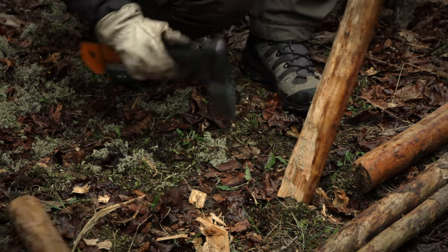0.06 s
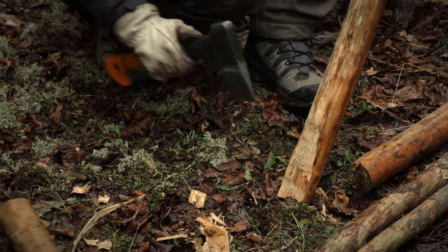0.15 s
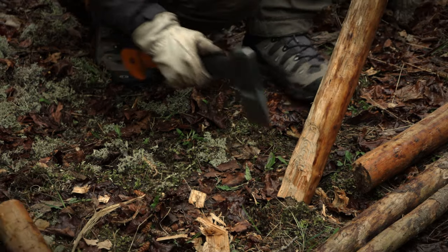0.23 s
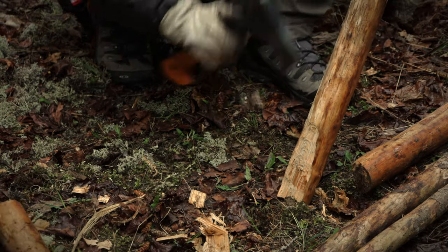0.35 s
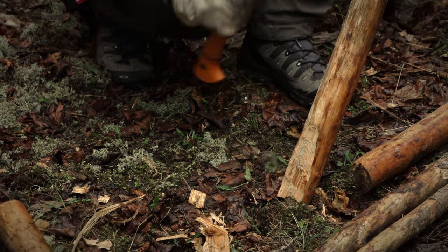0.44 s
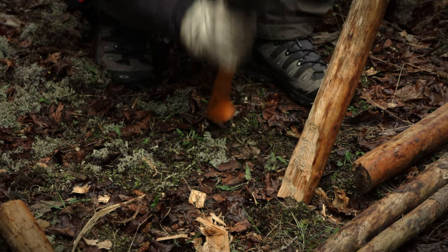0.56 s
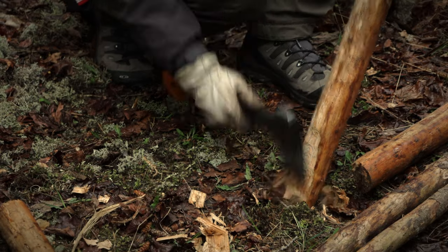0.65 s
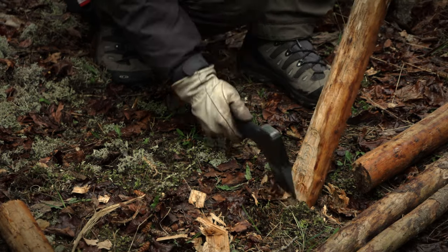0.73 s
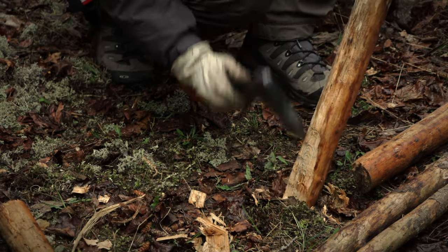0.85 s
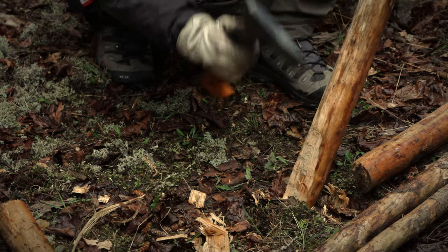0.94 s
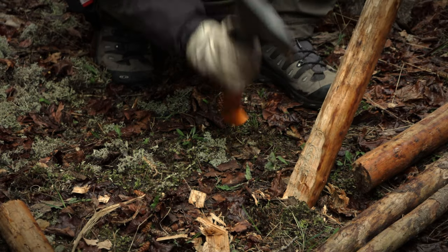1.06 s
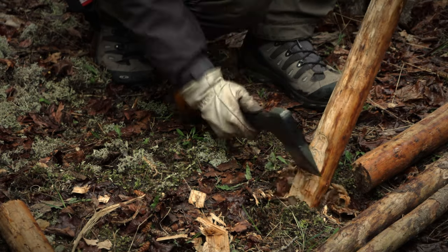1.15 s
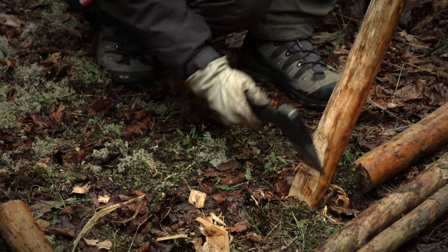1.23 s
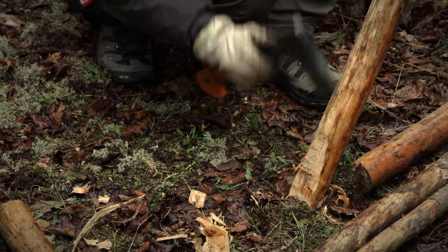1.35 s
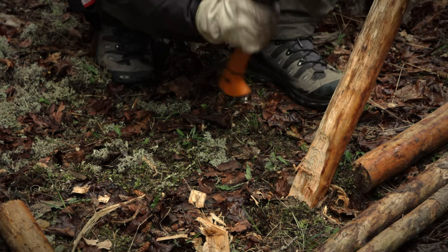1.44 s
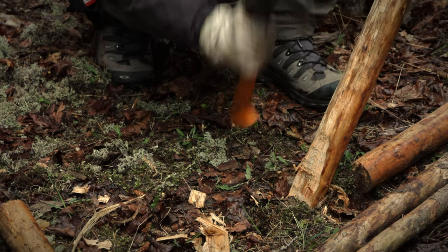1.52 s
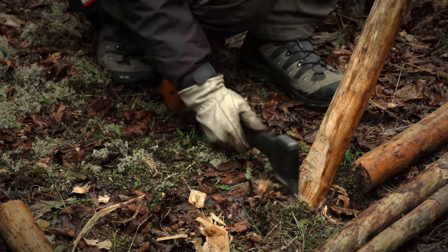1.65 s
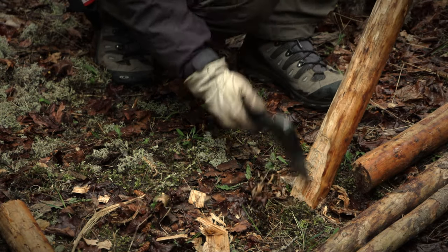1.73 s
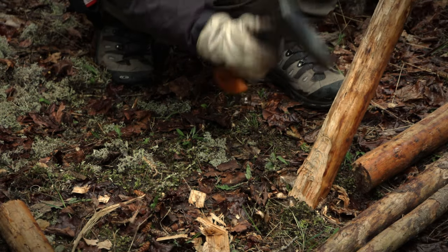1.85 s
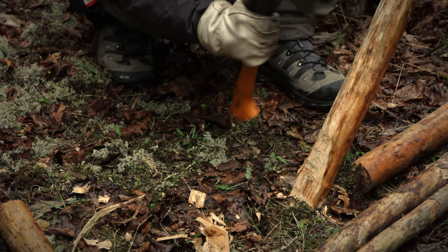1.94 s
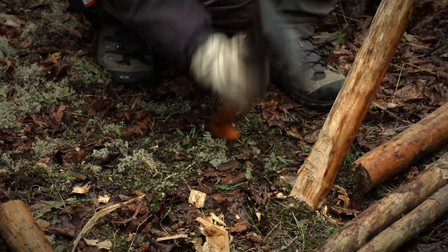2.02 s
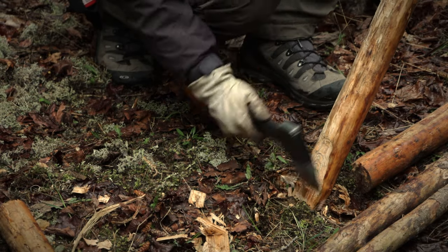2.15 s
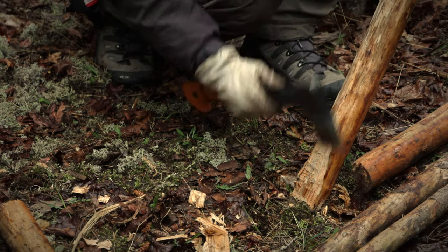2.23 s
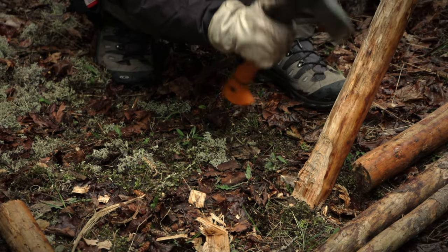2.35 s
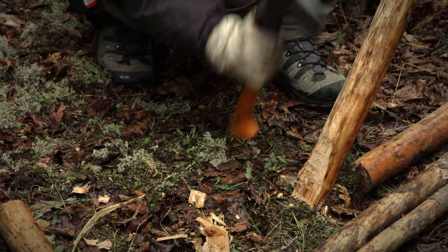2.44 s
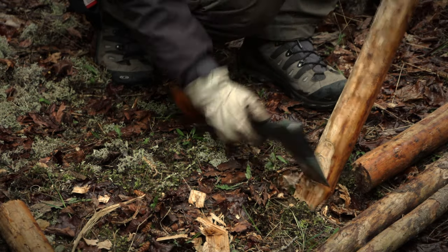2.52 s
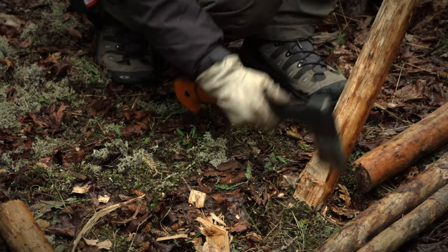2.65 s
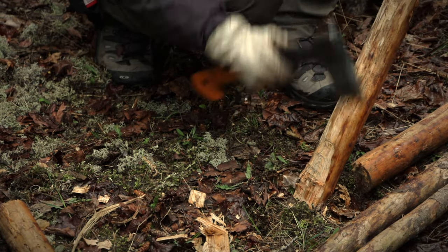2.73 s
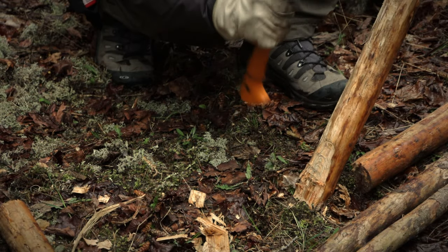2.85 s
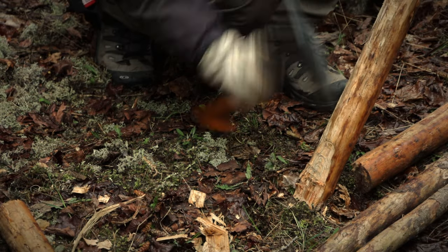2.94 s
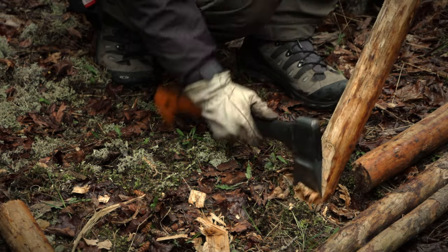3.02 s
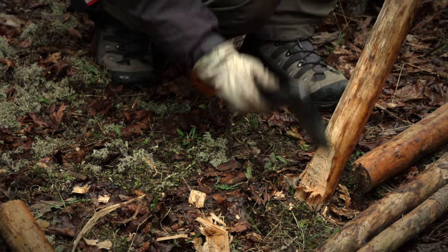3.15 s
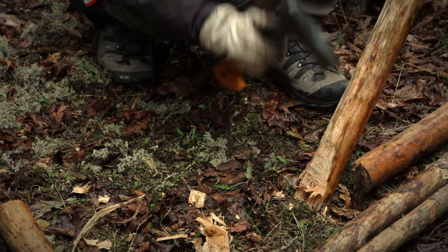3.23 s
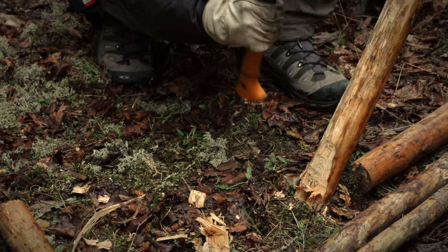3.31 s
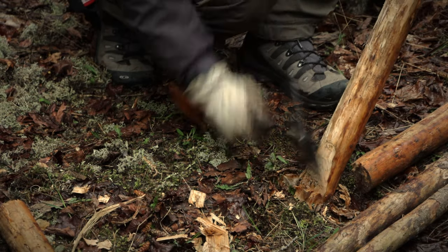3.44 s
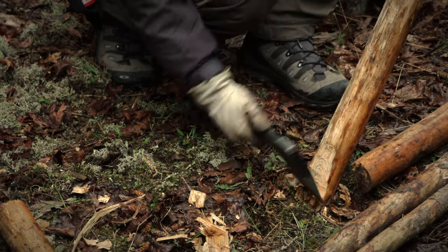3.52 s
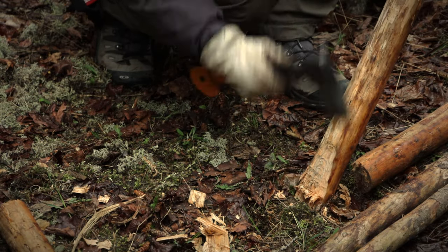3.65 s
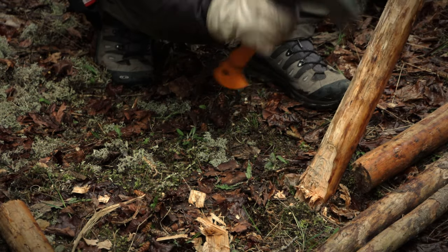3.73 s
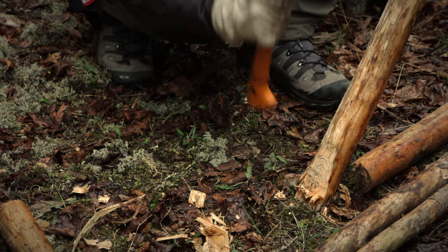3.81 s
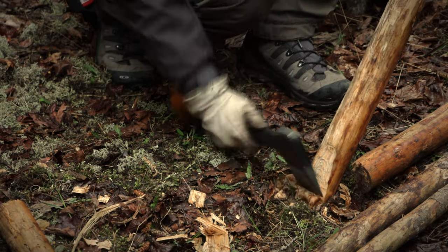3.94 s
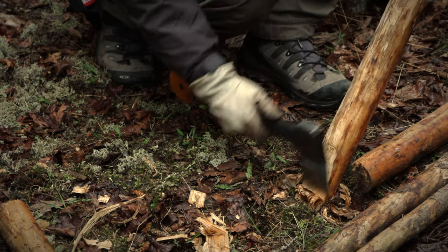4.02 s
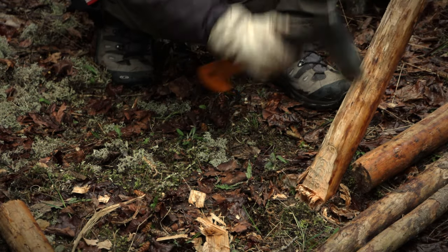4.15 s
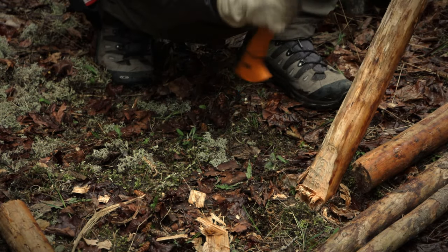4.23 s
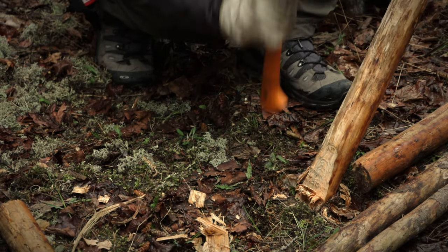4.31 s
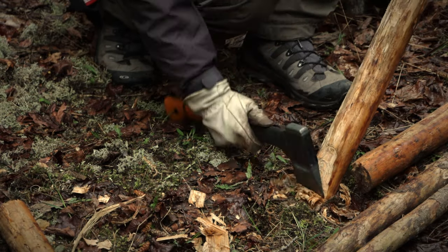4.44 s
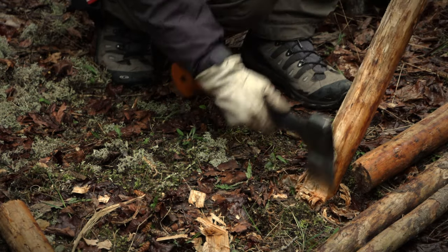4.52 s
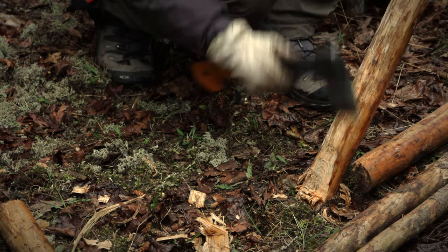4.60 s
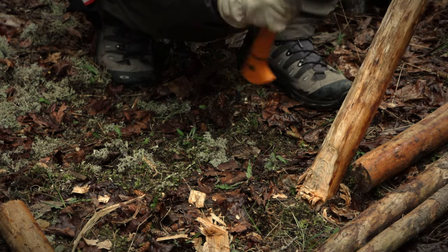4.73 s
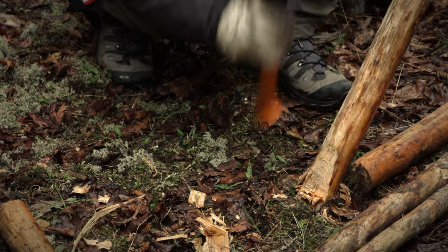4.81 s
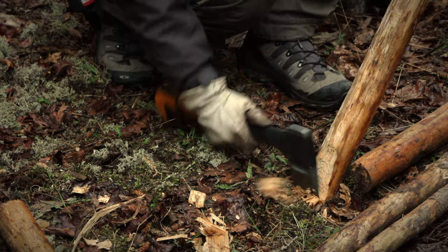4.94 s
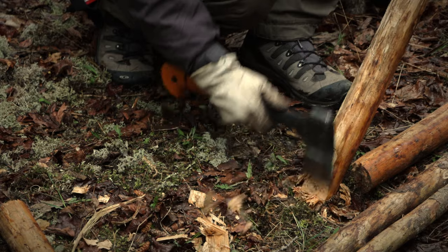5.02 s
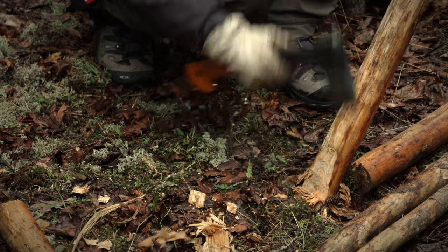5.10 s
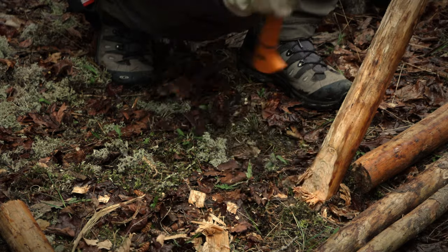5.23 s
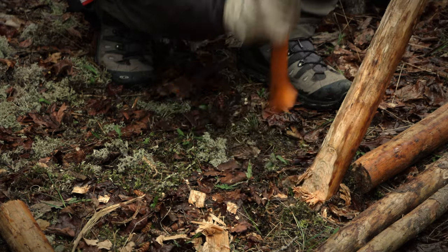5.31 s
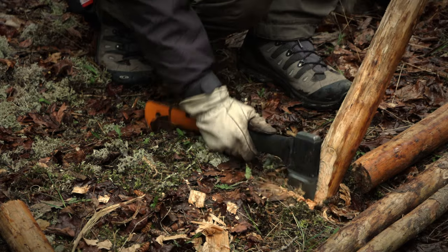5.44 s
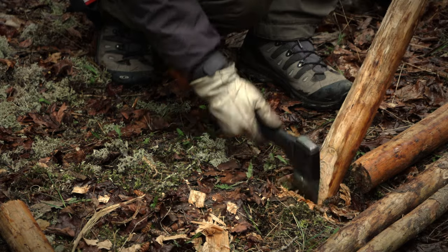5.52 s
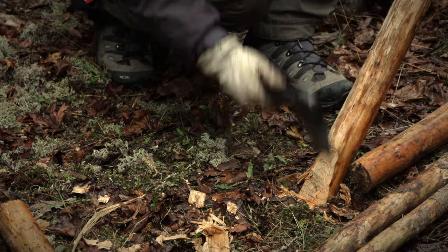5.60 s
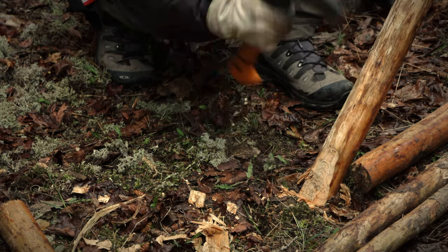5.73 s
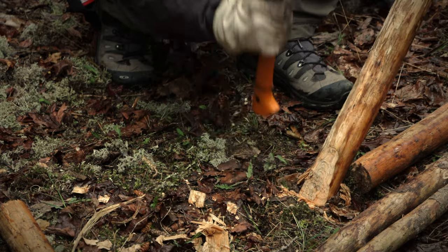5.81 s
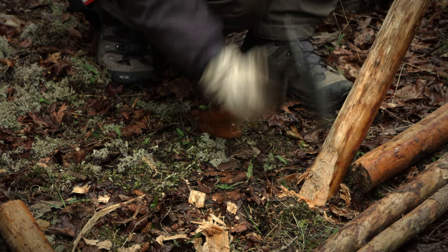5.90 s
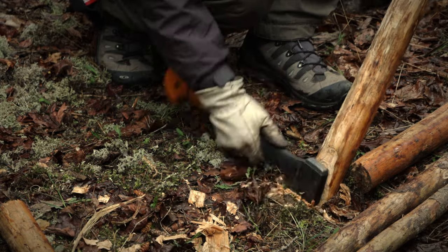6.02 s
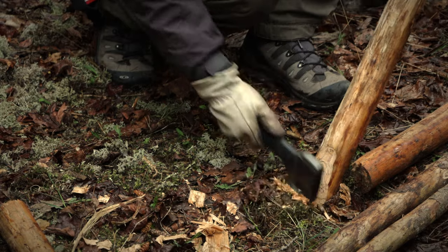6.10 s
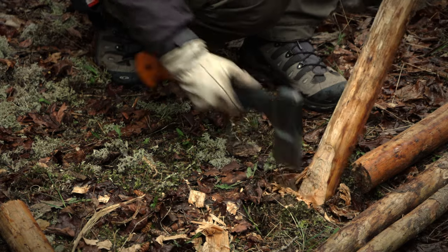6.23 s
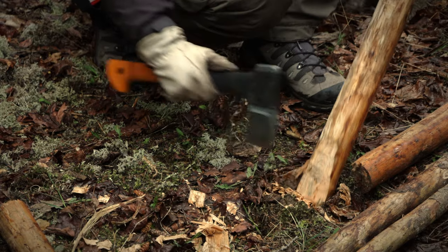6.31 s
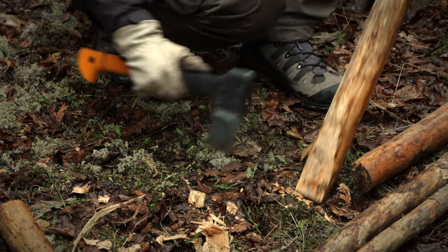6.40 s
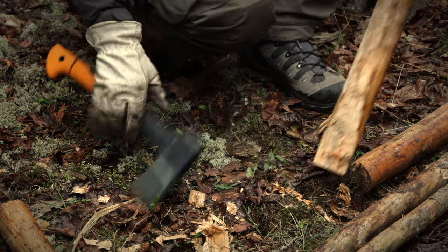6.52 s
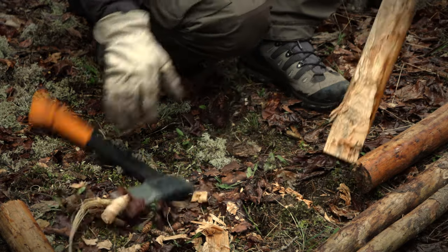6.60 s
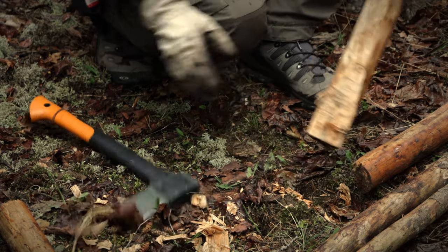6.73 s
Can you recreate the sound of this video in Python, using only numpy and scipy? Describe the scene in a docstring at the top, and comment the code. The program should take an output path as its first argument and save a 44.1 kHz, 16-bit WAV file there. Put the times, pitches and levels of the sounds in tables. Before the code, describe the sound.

Close, steady hatchet blows crack and knock on a wooden pole standing on moss, with faint rustles between and a soft rustling end.

```python
"""A hatchet trims the end of a wooden pole that stands on the mossy floor of a quiet forest: twelve chops.
Each blow rings the pole and handle (fading sine tones), tears fibres (crackling noise) and thuds the soil.
Between blows a sleeve swishes, the blade grazes the wood and dry leaves tick, all made from shaped noise.
At the end the hatchet is laid down. The trees scatter the sounds back, over a steady hush and a faint drone."""
import sys
import numpy as np
from scipy import signal
from scipy.fft import rfft, irfft, next_fast_len
from scipy.io import wavfile
from scipy.ndimage import uniform_filter1d, minimum_filter1d

SR = 44100
rng = np.random.default_rng(int(sys.argv[2]) if len(sys.argv) > 2 else 0)


def master_out(mix):
    """Clip the mix to full scale and print it as 16-bit PCM to the path in sys.argv[1]."""
    frames = np.transpose(np.atleast_2d(mix))
    ceiling = np.clip(frames, -1, 1)
    pcm = np.round(ceiling * 32767).astype(np.int16)
    wavfile.write(sys.argv[1], SR, pcm)


N = 298116
T = np.arange(SR * 3 // 5) / SR  # time within one event, in seconds

# In all tables, levels are relative, and t60_s is the time in which a sound fades by 60 dB. The chops: start_s,
# knock_db, place_along_pole_m, contact_s, repeat_after_s, crack_db, crack_tilt_db_per_octave, tearing_t60_s,
# handle_ring_db
CHOPS = [(0.7234, 3, 0.088, 0.0011, .0044, -22.5, 2.5, 0.079, -7),
         (1.2202, 3.5, .33, .0008, 0.007, -19.5, 2, 0.034, 2),
         (1.6833, 10, 0.12, .0008, 0.0036, -22, 3, 0.071, -3),
         (2.1615, 7, 0.12, 0.001, .0048, -22, 3.5, 0.046, -1),
         (2.606, 9, 0.15, 0.00091, 0.0053, -23.5, 0.5, 0.053, 2.5),
         (3.0669, 2, .25, 0.000093, 0.0029, -23, -2, 0.049, -15),
         (3.5424, 11.5, 0.11, 0.00071, 0.0059, -20.5, 1, 0.034, 2),
         (4.0164, 7.5, 0.18, 0.00036, 0.0047, -23.5, 0.8, 0.04, 2.5),
         (4.5003, 5.5, 0.19, 0.0011, 0.00635, -19, 1, 0.056, -1),
         (4.9858, 5, .24, 0.00017, 0.0057, -26, 0, 0.072, 0),
         (5.5046, 4, 0.26, 0.0002, 0.0032, -21, -3.5, 0.036, -4),
         (6.0331, 2, .41, .00015, 0.0061, -26, -1, 0.044, -11)]
# Bending modes of the pole, damped by hand and moss: pitch_hz, level_db, t60_s
POLE_MODES = [(135, -26, 0.04), (197, -30, 0.048), (332.7, -20.5, 0.052), (382, -26.5, 0.061),
              (575, -42, 0.044), (651, -13, 0.023), (847, -20, 0.043), (987, -13, 0.029),
              (1198, -20.5, 0.036), (1335, -22, 0.044), (1524, -37, 0.061), (1795, -31.5, 0.053)]
# Tone of tearing fibres: frequency_hz, level_db
FIBRE_COLOUR = [(100, -13.5), (400, 4.5), (1000, 5), (2000, -0.5), (4000, -4), (6000, -5.5), (8300, -3.5),
                (10000, -14), (13000, -8.5), (16000, -26)]
# The pole's upper resonances, which colour the tearing: centre_hz, width_hz, boost_db
UPPER_RESONANCES = [(2520, 110, 4.5), (2947, 150, 2.5), (3136, 240, 5.5), (3790, 150, 3.5),
                    (4540, 190, 4.5), (6640, 280, 2.5), (7440, 410, 2)]
# Larger chips that split off just after a blow: start_s, level_db, t60_s
CHIPS = [(0.7413, -34, 0.084), (1.689, -29.5, 0.12), (3.0696, -30, 0.022), (4.5037, -25.5, 0.024),
         (4.991, -30.5, 0.018), (5.509, -26, .04), (6.037, -22, 0.059)]
# The blade sings when it glances: start_s, centre_hz, filter_width_hz, level_db, t60_s
SINGS = [(1.684, 8600, 800, -39, 0.21), (2.607, 3560, 450, -51, 0.51), (4.017, 1590, 800, -49.5, 0.84),
         (4.986, 1620, 901, -49, 0.69), (6.034, 3340, 394, -52, 0.47)]
# Sleeve and leaves rustle as the arm, pole or hatchet moves: peak_s, swell_s, fall_s, level_db
RUBS = [(.012, 0.083, 0.15, -51.5), (.268, .17, 0.092, -46.5), (6.256, 0.12, 0.031, -39.5),
        (6.45, 0.32, 0.41, -54), (6.662, 0.039, 0.051, -35), (6.723, 0.015, 0.029, -37)]
# Tone of rustling: frequency_hz, level_db
RUB_COLOUR = [(200, -11), (800, 1.5), (1800, 4), (3500, 1), (8000, 0.5), (10000, -7.5), (14000, -4),
              (16000, -27)]
# The clearest ticks of dry leaves and falling chips: start_s, level_db, centre_hz
TICKS = [(0.084, -50, 1980), (0.298, -41, 6500), (0.573, -49, 4000), (1.525, -48.5, 3950),
         (2.120, -46, 5200), (2.345, -48.5, 2720), (3.89, -49.5, 8200), (4.196, -48.5, 6000),
         (5.193, -45.5, 4900), (5.317, -40, 4830), (5.441, -45, 2500), (5.842, -44, 3440)]
# Soft bumps on the soil: start_s, centre_hz, level_db, t60_s
BUMPS = [(5.949, 226, -51, 0.069), (6.662, 89, -47, 0.096), (6.687, 93, -45.5, .12),
         (6.729, 105, -50.5, .18)]
# Tone of the still forest air: frequency_hz, level_db
AIR_COLOUR = [(15, -29), (25, -3.5), (166, -4), (277, -5), (439, -1.5), (734, -1), (988, -2.5),
              (1400, -8.5), (1940, -11), (3250, -14.5), (4610, -16.5), (5280, -18), (8590, -18.5),
              (14800, -25), (16000, -24)]
# The soil thuds under the pole: pitch_hz, level_db, t60_s
SOIL_MODES = [(86.7, -44.5, 0.34), (112, -37, 0.094)]
# The hollow handle and its steel head ring on: pitch_hz, level_db, t60_s
HANDLE_MODES = [(253, -39, 0.35), (1240, -57, 0.24), (2760, -69, .25), (3200, -72, 0.21)]
# The blade grazes the wood just before it bites: start_s, level_db
GRAZES = [(.675, -52.5), (1.196, -43), (2.129, -41.5), (2.566, -39), (6.013, -46)]


def undb(db):
    """Turn decibels into gain."""
    return 10 ** (np.asarray(db) / 20)


def fade(t60):
    """Die away smoothly over one event, by 60 dB in t60 seconds."""
    return np.exp(-np.log(1000) * T / max(t60, 1e-3))


def unit(x):
    """Scale to an average (rms) level of 1."""
    return x / np.sqrt(np.mean(x ** 2))


def burst(x):
    """Scale a short sound so that its energy is that of rms 1 for 32 ms."""
    return x * np.sqrt(.032 * SR / np.sum(x ** 2))


def add(out, start_s, x):
    """Mix x into out from start_s on."""
    i = max(int(start_s * SR), 0)
    out[i:i + len(x)] += x[:max(len(out) - i, 0)]


def high_pass(x, hz):
    """Remove the bass below hz."""
    return signal.sosfilt(signal.butter(2, hz, "high", fs=SR, output="sos"), x)


def colour(x, points, peaks=(), tilt_db=0):
    """Shape the tone from (Hz, dB) points, resonances and a tilt per octave above 2000 Hz."""
    n = 2 * next_fast_len(len(x) // 2 + 2048)
    f = np.maximum(np.arange(n // 2 + 1) * SR / n, 1)
    hz, db = np.transpose(points)
    db = np.interp(np.log(f), np.log(hz), db)
    db = db + tilt_db * np.log2(np.maximum(f / 2000, 1))
    for centre, width, gain in peaks:
        db = db + gain / (1 + (2 * (f - centre) / width) ** 2)
    # folding the cepstrum makes the filter act only after each sound, never before it
    cepstrum = irfft(np.log(undb(db)))
    cepstrum[1:n // 2] *= 2
    cepstrum[n // 2 + 1:] = 0
    response = np.exp(rfft(cepstrum))
    return irfft(rfft(x, n) * response)[:len(x)]


def band(x, hz, width):
    """Pass x through one resonance, which favours frequencies near hz."""
    hz, width = min(hz, SR / 3), min(width, SR / 3)
    return signal.lfilter(*signal.iirpeak(hz, hz / width, fs=SR), x)


def narrow_band(x, hz, width):
    """Pass x through the same resonance twice, for steeper sides."""
    return band(band(x, hz, width), hz, width)


def ring(modes, detune=0.):
    """Add up fading sine tones, each a little off pitch by a random share detune."""
    total = 0
    for hz, db, t60 in modes:
        pitch_hz = hz * (1 + detune * rng.standard_normal())
        total = total + undb(db) * fade(t60) * np.sin(2 * np.pi * pitch_hz * T)
    return total


def grains(size, spread_db):
    """Make dense clicks: noise whose strength jumps at random every 8 samples."""
    sizes = undb(spread_db * np.minimum(rng.exponential(size=size // 8 + 1), 4))
    return unit(rng.standard_normal(size) * np.repeat(sizes, 8)[:size])


def wander(rate):
    """Drift between random values, with a new one rate times a second."""
    knots = np.arange(N) * rate / SR
    return np.interp(knots, np.arange(N // 20), rng.standard_normal(N // 20))


def air(hush_db=-55, waver_db=.3, drone_db=-68, drone_hz=122.4):
    """A steady distant hush of noise wavers slightly, and a faint far drone comes and goes."""
    level_db = hush_db + waver_db * wander(rate=3)
    hush = unit(colour(rng.standard_normal(N), AIR_COLOUR)) * undb(level_db)
    drone = unit(narrow_band(rng.standard_normal(N), drone_hz, 10.0))
    swell_db = np.interp(np.arange(N) / SR, [.7, 2, 5.5, 6.4], [1.5, -8.5, -8, 2.0])
    return hush + undb(drone_db + swell_db) * drone


def forest(x, near_db=-46.0, near_t60=0.15, far_db=-55, far_t60=0.48, rise_s=0.0055):
    """Ground and nearby trunks scatter a short tail, distant trees a faint and thinner one."""
    near_colour = [(100, 17), (300, 6), (800, -1.5), (2500, -7), (8000, 1.5), (15000, -16)]
    far_colour = [(100, -15), (400, -16.5), (1500, 2), (4000, 0.5), (8000, -5.5), (15000, -11)]
    near = colour(rng.standard_normal(len(T)) * fade(near_t60), near_colour)
    far = colour(rng.standard_normal(len(T)) * fade(far_t60), far_colour)
    echo = undb(near_db) * near + undb(far_db) * far
    echo = echo * np.minimum(T / rise_s, 1) ** 2
    return signal.fftconvolve(x, echo)[:N]


def litter(boost_db=3, tick_t60=0.02, faint_db=-57, range_db=7, count=150):
    """Brittle leaves give short noise ticks, few clear and many faint; the soil takes soft, low bumps."""
    out = np.zeros(N)
    size = SR // 20
    brittle = fade(tick_t60)[:size]
    faint = [(u * N / SR, faint_db + range_db * v ** 2, 3000 + 5000 * w)
             for u, v, w in rng.random((count, 3))]
    for start_s, db, hz in TICKS + faint:
        click = colour(grains(size, spread_db=0.0), RUB_COLOUR)
        snap = unit(band(click, hz, 0.98 * hz))
        add(out, start_s, undb(db + boost_db) * snap * brittle)
    for start_s, hz, db, t60 in BUMPS:
        thud = narrow_band(rng.standard_normal(len(T)) * fade(t60), hz, 1.1 * hz)
        add(out, start_s, undb(db) * burst(thud))
    return out


def rubs(catch_db=2, swing_db=-58, swing_s=0.12, graze_rise_s=.002, graze_fall_s=0.074, tilt_db=-0.3):
    """Grainy swishes swell, catch unevenly and stop: sleeve on each downswing, grazing blade, other moves."""
    t = np.arange(N) / SR
    swings = [(chop[0], swing_s, swing_s / 2, swing_db) for chop in CHOPS]
    grazes = [(s + graze_rise_s, graze_rise_s, graze_fall_s, db) for s, db in GRAZES]
    power = np.zeros(N)
    for peak_s, swell_s, fall_s, db in swings + grazes + RUBS:
        swell = np.interp(t, [peak_s - swell_s, peak_s, peak_s + fall_s], [0, 1, 0])
        power += (undb(db) * swell) ** 2
    rustle = grains(N, spread_db=2.0) * undb(catch_db * wander(rate=250))
    return np.sqrt(power) * unit(colour(rustle, RUB_COLOUR, tilt_db=tilt_db))


def tear(t60, tilt_db=0, rise_s=0.00074, cleave_db=5, cleave_t60=0.02, splinter_db=-23, splinter_t60=0.13):
    """The edge cleaves the surface, fibres snap in a dense crackle as it slows, and splinters follow."""
    cleave = undb(cleave_db) * fade(cleave_t60)
    splinters = undb(splinter_db) * fade(splinter_t60)
    force = (cleave + fade(t60) + splinters) * (1 - np.exp(-T / rise_s))
    snaps = grains(len(T), spread_db=3.0) * force
    return burst(colour(snaps, FIBRE_COLOUR, UPPER_RESONANCES, tilt_db))


def pole_modes(place_m, node_width=0.18, uneven_db=3.0):
    """A blow feeds each bending mode as far as the pole swings there; on a still point it stays weak."""
    wave_m, wave_hz = .52, 1000  # length of a bending wave in the pole at this frequency
    hz, db, t60 = np.transpose(POLE_MODES)
    angle = 2 * np.pi * abs(place_m) / wave_m * np.sqrt(hz / wave_hz)
    swing = np.cos(angle + np.pi / 4) + np.exp(-angle) / np.sqrt(2)  # shape of a free end
    swing_db = 20 * np.log10(np.hypot(swing, node_width))
    return zip(hz, db + swing_db + uneven_db * rng.standard_normal(len(hz)), t60)


def pole_knock(place_m, contact_s):
    """The blade pushes the pole and its modes ring; a longer contact gives a duller knock."""
    push = np.sin(np.pi * np.minimum(T / max(contact_s, 2 / SR), 1))[:SR // 100]
    # the changing grip detunes the pole from blow to blow
    tones = ring(pole_modes(place_m), detune=.018)
    knock = signal.fftconvolve(tones, push / push.sum())
    return high_pass(knock, 105)  # the knock carries no deep bass


def chops(repeat_db=-7, leaves_db=-20, leaves_t60=0.26, chip_low_hz=1070):
    """Each blow knocks the pole, and a softer copy of the knock follows a few ms later; the cut crackles, soil
    and handle ring."""
    out = np.zeros(N)
    for start_s, knock_db, place_m, contact_s, repeat_s, crack_db, tilt_db, t60, handle_db in CHOPS:
        knock = undb(knock_db) * pole_knock(place_m, contact_s)
        add(out, start_s, knock)
        add(out, start_s + repeat_s, undb(repeat_db) * knock)
        add(out, start_s, undb(crack_db) * tear(t60, tilt_db))
        add(out, start_s, ring(SOIL_MODES, detune=0.023))
        add(out, start_s, undb(handle_db) * ring(HANDLE_MODES, detune=0.0075))
        # sprayed crumbs and shaken leaves settle
        settle = grains(len(T), spread_db=4) * fade(leaves_t60)
        add(out, start_s, undb(crack_db + leaves_db) * colour(settle, RUB_COLOUR))
    for start_s, db, t60 in CHIPS:
        # a chip is too small to radiate much bass
        add(out, start_s, undb(db) * high_pass(tear(t60), chip_low_hz))
    for start_s, hz, width, db, t60 in SINGS:
        cluster = narrow_band(rng.standard_normal(len(T)), hz, width)
        add(out, start_s, undb(db) * unit(cluster) * fade(t60))
    return out


def scene():
    """Mix the work, its echo among the trees and the air."""
    work = chops() + rubs() + litter()
    return (work + forest(work) + air())[None]


def record(dry, low_cut_hz=48, ceiling=.62, top_hz=15900):
    """The microphone sheds the deepest bass, a fast limiter holds the loud peaks and the top is cut."""
    x = high_pass(dry, low_cut_hz)
    gain = ceiling / np.maximum(np.abs(x), ceiling)
    # hold each dip in gain for 25 samples, then smooth it
    gain = uniform_filter1d(minimum_filter1d(gain, size=25), size=25)
    return signal.sosfilt(signal.ellip(8, .2, 70, top_hz, fs=SR, output="sos"), x * gain)


dry = scene()
out = record(dry)
master_out(out)
```